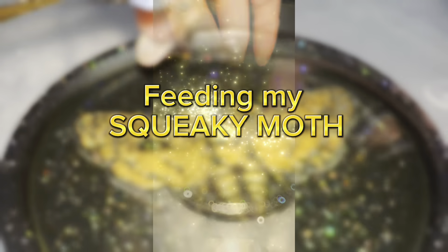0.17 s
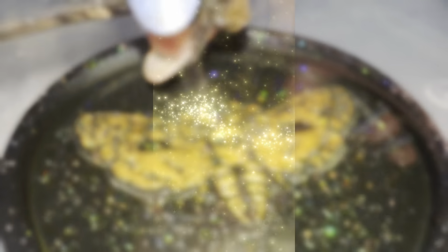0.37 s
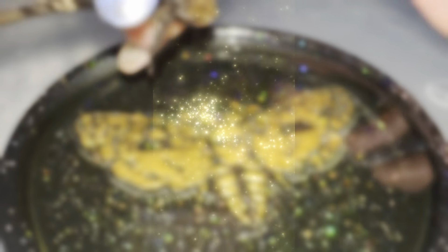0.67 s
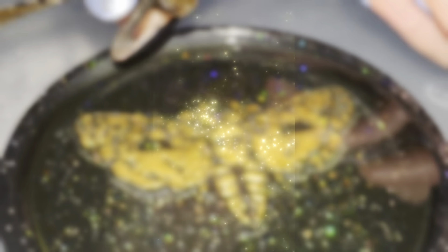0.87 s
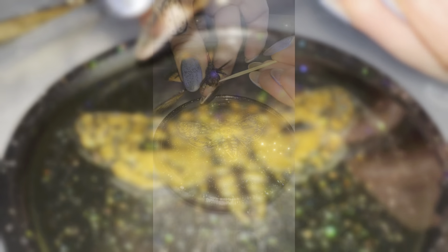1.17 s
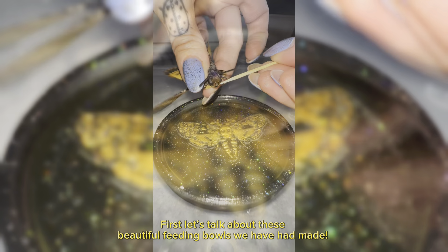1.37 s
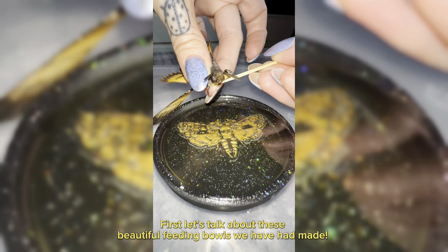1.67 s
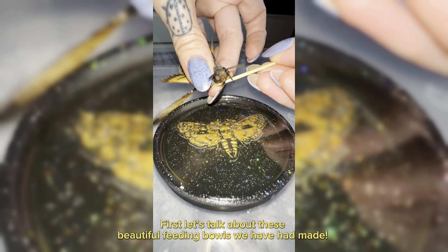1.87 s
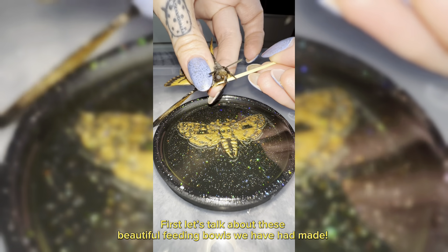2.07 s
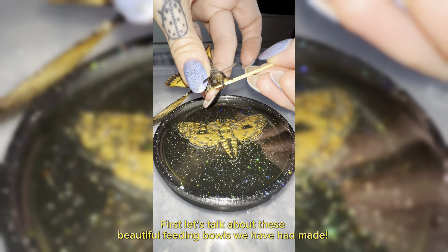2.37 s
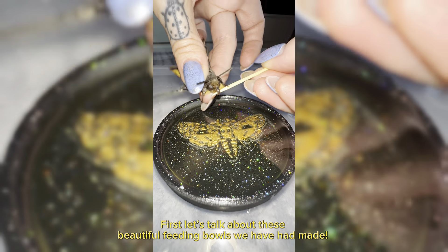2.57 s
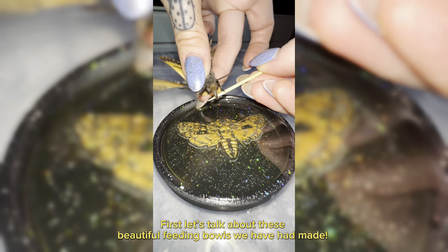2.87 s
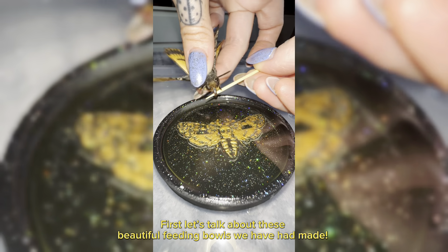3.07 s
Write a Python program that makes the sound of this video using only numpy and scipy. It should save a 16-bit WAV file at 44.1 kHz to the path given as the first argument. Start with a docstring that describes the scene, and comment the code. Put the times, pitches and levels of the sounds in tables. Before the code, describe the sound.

Rapid, irregular raspy squeaks and dry clicks from a hand-held moth, close up, over faint low rumble

```python
"""A low, wavering hum and rumble run throughout, with soft bumps of hands and taps of a feeding stick by a dish
among the flicks, squeaks and whistles of a hand-held hawkmoth, close to two microphone ports in a small room.
Air drawn in flutters a flap in its throat: single flicks and bursts of sharp pulses, most slowing as the gulp ends.
Air pushed out gives a short, unsteady whistle. Hands and dish scatter the moth's sound; the room adds a faint tail."""
import sys
import numpy as np
from scipy import signal
from scipy.fft import rfft, irfft, next_fast_len
from scipy.io import wavfile
from scipy.ndimage import map_coordinates

SR = 44100
rng = np.random.default_rng(int(sys.argv[2]) if len(sys.argv) > 2 else 0)


def master(y):
    """Save y as 16-bit WAV."""
    cut = np.clip(np.atleast_2d(y).T, -1, 1)
    pcm = np.round(cut * 32767)  # scale
    wavfile.write(sys.argv[1], SR, pcm.astype(np.int16))


N = 143325  # length in samples

# Wavering hum: start_s, pitch_hz, level_db
HUM = [(0, 101.7, -65), (0.799, 100.1, -66), (1.36, 84.01, -61.5), (1.42, 81.9, -55.5),
       (1.582, 79.7, -50.5), (1.63, 83.64, -66), (1.902, 102.2, -72.5), (3.25, 100, -61)]
# Spectrum of the room's rumble and hiss: frequency_hz, relative_level_db
FLOOR_COLOUR = [(22, -27.5), (50, 6), (70, 3), (110, -2), (200, -13.5), (400, -29.5), (800, -36.5),
                (2400, -28), (5000, -34.5), (8000, -35), (12000, -55), (15500, -43.5)]
# Width of that floor: frequency_hz, side_over_mid_db
FLOOR_WIDTH = [(100, -6), (500, 11), (2000, -8), (7000, -2.5)]
# Light taps of stick and fingers: start_s, level_db
TAPS = [(.003, -44.5), (.323, -43), (.466, -42.5), (.648, -49), (0.936, -53), (1.416, -44), (1.557, -52),
        (2.72, -47.5), (2.804, -47.5), (2.8797, -41), (3.1533, -58.5)]
# Spectrum of a tap: frequency_hz, relative_level_db
TAP_COLOUR = [(60, -2), (220, 8.5), (400, -2), (700, -8), (1250, -4), (2300, -16), (6000, -22.5)]
# Dull bumps of the hands: start_s, level_db, resonance_hz
BUMPS = [(.004, -46.5, 129.7), (.09, -42, 149), (.11, -46, 62.7), (.332, -51, 77.6), (.466, -49, 184),
         (.926, -53, 109.4), (2.722, -55.5, 163), (2.84, -51, 70), (2.884, -40.5, 204.5),
         (2.892, -41.5, 78.5), (3.172, -54, 66.5)]
# Spectrum of the rumble in a bump: frequency_hz, relative_level_db
BUMP_RUMBLE = [(25, -21), (70, 1.5), (220, -4), (500, -29), (1500, -62.5)]
# Bursts of the flap: start_s, length_s, first_gap_ms, last_gap_ms, level_db, swell_s
SQUEAKS = [ (0.2233, 0.032, 2.7, 3.73, -4.5, .001), (0.26, 0.014, 4.7, 4.1, -2, .001),
           (0.3715, .034, 1.48, 2.57, -5, .011), (0.4978, 0.013, 2.08, 2.95, -5, 0.0009),
           (0.5523, 0.006, 2.6, 3.2, -4, .001), (0.578, 0.005, 3.77, 3.27, -4.5, .001),
           (0.603, 0.0071, 2.3, 2.7, -3, .001), (0.6462, .0592, 2.14, 3.08, -4, 0.00086),
           (1.1037, 0.029, 1.78, 2.7, -6, .0033), (1.1696, 0.054, 1.65, 3.4, -3.5, 0.00094),
           (1.334, .011, 2.3, 3.1, -19.5, 0.0029), (1.3525, 0.0082, 2.36, 3.4, -11.5, .001),
           (1.432, 0.0077, 3, 3.3, -9.5, 0.00087), (1.4766, .016, 1.68, 2.42, -5.5, 0.0017),
           (1.7114, .015, 1.68, 3.43, -9, 0.0014), (1.7342, .019, 1.32, 3.56, -6.5, .001),
           (1.7896, .019, 1.85, 3.18, -3, 0.00093), (1.8352, 0.033, 2.35, 3.3, -4, .001),
           (2.002, .011, 1.5, 1.38, -22.5, .0048), (2.0317, .011, 1.38, 1.76, -18.5, 0.0012),
           (2.0825, 0.0057, 2.57, 3.02, -22.5, 0.00076), (2.1316, 0.017, 1.35, 2.65, -14.5, .0023),
           (2.1896, .019, 1.45, 2.1, -14, 0.00094), (2.246, .047, 1.53, 2.86, -12.5, 0.0036),
           (2.423, 0.053, 1.37, 3.76, -15.5, 0.036), (2.508, 0.012, 2.9, 3.7, -17.5, 0.00098),
           (2.5312, .0452, 2.45, 4.16, -17, 0.00097), (2.677, 0.097, 2, 5.72, -18, 0.019),
           (2.894, .025, 1.52, 2.77, -20, .011), (2.9266, 0.079, 2.2, 4.9, -18.5, .0012),
           (3.114, 0.0063, 2.07, 2.5, -36.5, .001), (3.2135, 0.0082, 3.3, 3.65, -26.5, 0.0056),
           (3.2282, 0.019, 3.56, 3.2, -23.5, 0.0011)]
# Single flicks of the flap: start_s, level_db
FLICKS = [(0.016, -13), (.326, -14), (0.5643, -3.5), (.729, -10), (.754, -21), (1.277, -16.5),
          (1.8824, -7.5), (1.8951, -10.5), (2.0589, -20.5), (2.3178, -19), (2.4945, -20.5), (2.5849, -16.5),
          (2.7916, -18.5), (2.8106, -26), (3.0137, -19), (3.0286, -29.5), (2.3457, -17.5), (3.1319, -32.5)]
# Response of the throat: frequency_hz, level_db
THROAT = [(200, -46), (650, -43), (1000, -29.5), (1600, -30), (2200, -36.5), (2800, -23.5), (3600, -15.5),
          (4700, -12), (5800, -18), (6500, -14), (7300, -1.5), (8100, 1.63), (9200, -4.5), (10400, -11.5),
          (11500, -12), (13000, -14), (14100, -15), (15500, -10)]
# Throat colour as the moth is turned: start_s, tuning_ratio, top_treble_db, lower_body_db
DRIFT = [(0.599, 0.95, 0, -3.5), (1.349, 1, -7.5, -2.5), (1.8, .99, 3, -4), (2.25, 0.99, 6, 2),
         (2.7, 1, 16, 7)]
# The top treble change fades in, and the lower body change fades out, between: from_hz, to_hz
TREBLE_EDGE_HZ = (8060, 16200)
BODY_EDGE_HZ = (4500, 6800)
# Whistles: start_s, length_s, first_pitch_hz, middle_pitch_hz, last_pitch_hz, level_db,
# second_partial_db, hoarseness_db (the last two relative to the whistle)
WHISTLES = [(0.2863, 0.013, 3960, 4320, 4150, -42, 4.5, 1.5), (.728, 0.0089, 3900, 4613, 4770, -42, 1.5, 2),
            (0.753, 0.0097, 4810, 3945, 3220, -49.5, 14.5, -2.5),
            (1.229, .0105, 3490, 4447, 4600, -38.5, 6, -7),
            (1.2397, 0.018, 4400, 4625, 4640, -38.5, 0.5, 3),
            (1.876, 0.023, 2500, 2980, 2993, -65.5, 16.5, 14),
            (2.323, 0.0199, 6550, 6520, 6420, -48.5, -15, -4.5),
            (2.601, .012, 6610, 6600, 6880, -49.5, -16, -5),
            (2.6223, 0.0083, 7090, 6900, 7060, -46, -15, -9)]
# Phase between the microphone ports: frequency_hz, left_lead_radians
PORT_PHASE = [(3500, 0), (5500, -0.25), (7800, -1.81), (9100, -1.32), (10500, -3), (12800, -3),
              (14300, -4.5), (16000, -3)]
# Decay of the room by 60 dB: frequency_hz, decay_s
ROOM_T60 = [(200, 1), (4000, 0.63), (8000, 0.2), (15000, 0.062)]

FLOOR_DB, HUM_OVERTONE_DB = -63.5, -26
TAP_T60_S, TICK_T60_S, TICK_HZ = 0.11, 0.023, 657  # dull knock below TICK_HZ outlasts the tick above it
TAP_SIDE_DB = 7  # side over mid of the knock
BUMP_RISE_S, BUMP_T60_S, BUMP_RUMBLE_DB = .005, 0.2, -8
BUMP_CYCLES = 9.3  # a swing dies away by 60 dB within these cycles
PULSE_DB, SIZE_SCATTER_DB, COLOUR_SCATTER_DB = -1, 1.1, 2.5
FLEX_DB, SAG_DB = 1.95, 1.5  # change of throat shape; weakening by the end of a burst
PULSE_LEAD_S, PULSE_RISE_S = .0017, .0016
RING_SHARE = .3  # share of the minimum phase that makes the throat ring after the snap
JITTER, SLOWING_POWER = .16, 2
FLUTTER_AIR_DB, AIR_SPILL_S = -38, 0.012
WHISTLE_EDGE_S, WAVER_PER_S = 0.0003, 910
WHISTLE_WAVER, WHISTLE_FLUTTER_DB, BEND_POWER = .016, 2.2, 1.6  # waver is a fraction of pitch
SPLIT_DB = -6.5  # halfway partial, relative to the hoarseness
NEAR_DB, NEAR_T60_S, ROOM_DB = -10, 0.0077, -22
ROLL_OFF_HZ, TOP_HZ = 15900, 16900


def amp(db):
    """Decibels to gain."""
    return 10 ** (np.asarray(db) / 20)


def unit(x):
    """Scale to rms 1."""
    return x / np.sqrt(np.mean(x ** 2) + 1e-20)


def along(points, hz):
    """Read (frequency_hz, value) points on a log frequency axis."""
    f, v = np.transpose(points)
    return np.interp(np.log(hz + 1), np.log(f + 1), v)


def filtered(x, response):
    """Multiply the spectrum of x by a complex response of frequency."""
    n = x.shape[-1]
    m = next_fast_len(n + 4096)
    return irfft(rfft(x, m) * response(np.fft.rfftfreq(m, 1 / SR)), m)[..., :n]


def noise(colour, size):
    """Coloured noise of rms 1."""
    white = rng.standard_normal(size)
    return unit(filtered(white, lambda hz: amp(along(colour, hz))))


def wobble(rate, t):
    """A smooth random curve with rate knots a second."""
    knots = rng.standard_normal(int(t[-1] * rate) + 4)
    return map_coordinates(knots, [t * rate])


def add(track, s, x):
    """Mix x into the track at s seconds."""
    i = max(round(s * SR), 0)
    track[i:i + len(x)] += x[:max(N - i, 0)]


def background():
    """A low hum with weak overtones, stronger on the left, over wide coloured noise for rumble and hiss."""
    t = np.arange(N) / SR
    s, pitch, level = np.transpose(HUM)
    hz = np.interp(t, s, pitch) * (1 + .025 * wobble(15, t))
    phase = 2 * np.pi * np.cumsum(hz) / SR
    overtones = sum(2 / k * np.sin(k * phase) for k in range(2, 10))
    gain = np.sqrt(2) * amp(np.interp(t, s, level) + 1.4 * wobble(14, t))
    hum = gain * (np.sin(phase) + amp(HUM_OVERTONE_DB) * overtones)
    mid = noise(FLOOR_COLOUR, N)
    side = filtered(noise(FLOOR_COLOUR, N), lambda hz: amp(along(FLOOR_WIDTH, hz)))
    return hum * amp([[1.5], [-1.5]]) + amp(FLOOR_DB) * np.array([mid + side, mid - side])


def taps():
    """Dry, light contacts of stick and fingers: a brief tick in the centre over a duller, wide knock."""
    out, t = np.zeros((2, N)), np.arange(SR // 2) / SR
    onset = 1 - np.exp(-t / 0.0021)
    for s, db in TAPS:
        contact = noise(TAP_COLOUR, (2, len(t)))
        dull = filtered(contact, lambda hz: 1 / (1 + (hz / TICK_HZ) ** 4))
        knock, wide = dull * amp(-60 * t / TAP_T60_S)
        tick = 2 * (contact - dull)[0] * amp(-60 * t / TICK_T60_S)
        for port, sign in zip(out, (1, -1)):
            body = .5 * (knock + sign * amp(TAP_SIDE_DB) * wide)
            add(port, s, amp(db) * onset * (tick + body))
    return out


def bumps():
    """Dull bumps of the hands: a few damped swings at a resonance and a short rumble."""
    out, t = np.zeros(N), np.arange(SR // 2) / SR
    onset = 1 - np.exp(-(t / BUMP_RISE_S) ** 2)
    for s, db, hz in BUMPS:
        swing = 2 * np.sin(2 * np.pi * hz * t) * amp(-60 * t * hz / BUMP_CYCLES)
        rumble = amp(BUMP_RUMBLE_DB - 60 * t / BUMP_T60_S) * noise(BUMP_RUMBLE, len(t))
        add(out, s, amp(db) * onset * (swing + rumble))
    return out


def pulse(delay_s, s, flex, size=512):
    """One snap of the flap at s seconds: the flexing throat colours it, and it swells and rings out."""
    when, *columns = np.transpose(DRIFT)
    tuning, top_db, body_db = [np.interp(s, when, c) for c in columns]
    hz = np.fft.rfftfreq(size, 1 / SR)
    db = along(THROAT, hz / tuning)
    db = db + top_db * np.interp(hz, TREBLE_EDGE_HZ, [0, 1])
    db = db + body_db * np.interp(hz, BODY_EDGE_HZ, [1, 0])
    # Each pulse has the shape of the throat plus a little scatter of its own
    shape_db = FLEX_DB * flex + COLOUR_SCATTER_DB * rng.standard_normal(len(flex))
    db = db + np.interp(hz, np.linspace(0, SR / 2, len(flex)), shape_db)
    # The folded cepstrum gives the minimum phase
    cepstrum = irfft(np.log(amp(db)))
    ringing = rfft(np.r_[cepstrum[0], 2 * cepstrum[1:size // 2]], size).imag
    phase = RING_SHARE * ringing - 2 * np.pi * hz * (delay_s + PULSE_RISE_S)
    return 2 * irfft(amp(db) * np.exp(1j * phase))


def squeaks(count=32):
    """Drawn-in air flutters the flap in weakening bursts, more unevenly when louder, with a hiss of air."""
    out = np.zeros(N)
    for s, length, first, last, db, swell in SQUEAKS:
        u = np.linspace(0, 1, 100)
        gap_s = (first + (last - first) * u ** SLOWING_POWER) / 1000
        cycles = np.cumsum(length / gap_s) / len(u)
        stumble = JITTER * amp(db) * rng.standard_normal(max(round(cycles[-1]), 1))
        steps = np.cumsum(np.exp(stumble))
        beats = np.r_[0, steps / steps[-1]] * cycles[-1]
        shape_from, shape_to = rng.standard_normal((2, count))
        for t in np.interp(beats, cycles, u * length):
            at = s + t - PULSE_LEAD_S
            level = PULSE_DB + db + SIZE_SCATTER_DB * rng.normal() - SAG_DB * (t / length) ** 2
            rise = min(1, (t + gap_s[0]) / (swell + gap_s[0] / 2))
            flex = shape_from + (shape_to - shape_from) * t / length
            part_sample_s = at - round(at * SR) / SR
            add(out, at, amp(level) * rise * pulse(part_sample_s, s, flex))
        # The hiss spills out before and after the burst
        n = int((length + 2 * AIR_SPILL_S) * SR)
        air = noise(THROAT, n) * np.hanning(n) ** 2
        add(out, s - AIR_SPILL_S, amp(db + FLUTTER_AIR_DB) * air)
    for s, db in FLICKS:
        add(out, s - PULSE_LEAD_S, amp(PULSE_DB + db) * pulse(0, s, np.zeros(count)))
    return out


def whistles():
    """Air leaving the open throat sings in a bending, fluttering tone; hoarseness adds hiss and a partial."""
    out = np.zeros(N)
    for s, length, first, middle, last, db, second_db, hoarse_db in WHISTLES:
        t = np.arange(int(length * SR)) / SR
        u = 2 * t / length - 1  # -1 at the start, 0 in the middle, 1 at the end
        hz = middle + (np.where(u < 0, first, last) - middle) * np.abs(u) ** BEND_POWER
        hz = hz * (1 + WHISTLE_WAVER * wobble(WAVER_PER_S, t))
        phase = 2 * np.pi * np.cumsum(hz) / SR
        # The hoarse partial lies halfway between the first two
        partials = [(1, 0), (1.5, hoarse_db + SPLIT_DB), (2, second_db)]
        tone = 0
        for k, level in partials:
            flutter = WHISTLE_FLUTTER_DB * wobble(WAVER_PER_S, t)
            tone = tone + np.sqrt(2) * amp(level + flutter) * np.sin(k * phase)
        hiss = amp(hoarse_db) * noise(THROAT, len(t))
        gate = np.minimum(1, np.minimum(t, length - t) / WHISTLE_EDGE_S)
        add(out, s, amp(db) * gate * (tone + hiss))
    return out


def near_surfaces(x):
    """Hands and dish scatter the moth's sound within a few milliseconds: a short decaying noise echo."""
    t = np.arange(SR // 20) / SR
    scatter = rng.standard_normal(len(t)) * amp(-60 * t / NEAR_T60_S) * (t > .0005)
    echo = signal.fftconvolve(x, scatter / np.linalg.norm(scatter))[:N]
    return x + amp(NEAR_DB) * echo


def room(x):
    """A room tail of noise, different in each channel, whose treble dies away sooner."""
    hz, t, z = signal.stft(rng.standard_normal((2, SR // 2)), SR, nperseg=256)
    decay = amp(-60 * t / along(ROOM_T60, hz)[:, None])
    tail = signal.istft(z * decay, SR, nperseg=256)[1]
    return signal.fftconvolve(x[None], tail / np.linalg.norm(tail[0]), axes=1)[:, :N]


def scene():
    """The moth sits a little nearer the right microphone port; the bumps come through more on the left."""
    rasp, song = squeaks(), whistles()
    signs = np.array([[1], [-1]])
    pair = filtered(rasp + song, lambda hz: np.exp(.5j * along(PORT_PHASE, hz) * signs))
    moth = np.array([near_surfaces(port) for port in pair])
    hands = taps() + bumps() * amp([[1.5], [-1.5]])
    tail = amp(ROOM_DB) * room(rasp + 0.17 * song + hands[0])
    return moth + hands + tail + background()


def record(dry):
    """The microphone's top treble rolls off, and nothing is kept above the band limit."""
    return filtered(dry, lambda hz: np.interp(hz, [ROLL_OFF_HZ, TOP_HZ], [1, 0]) ** 2)


dry = scene()
out = record(dry)
master(out)
```